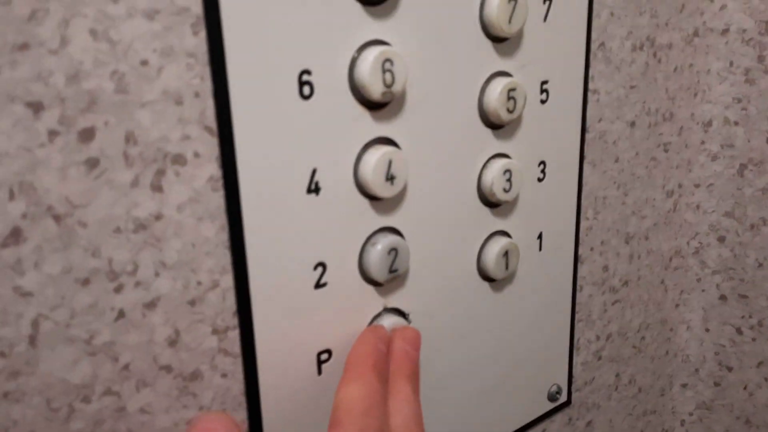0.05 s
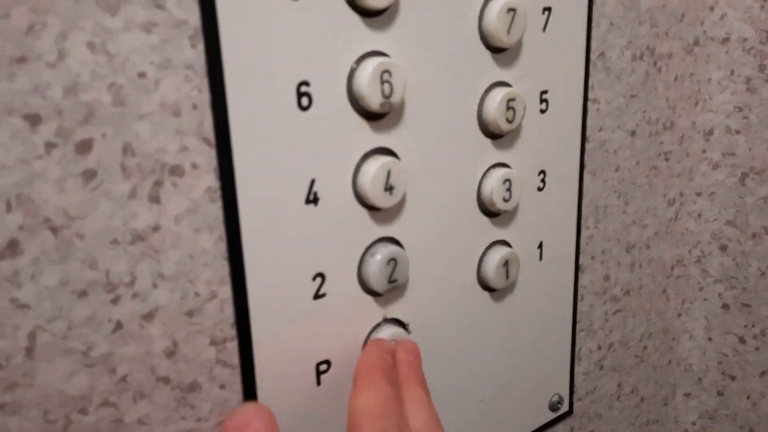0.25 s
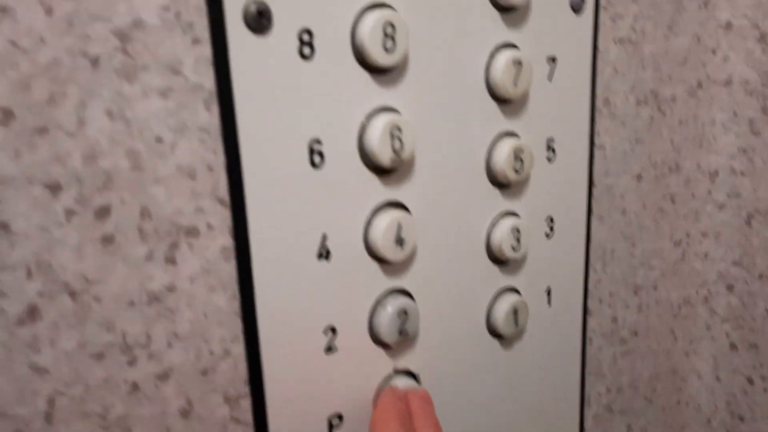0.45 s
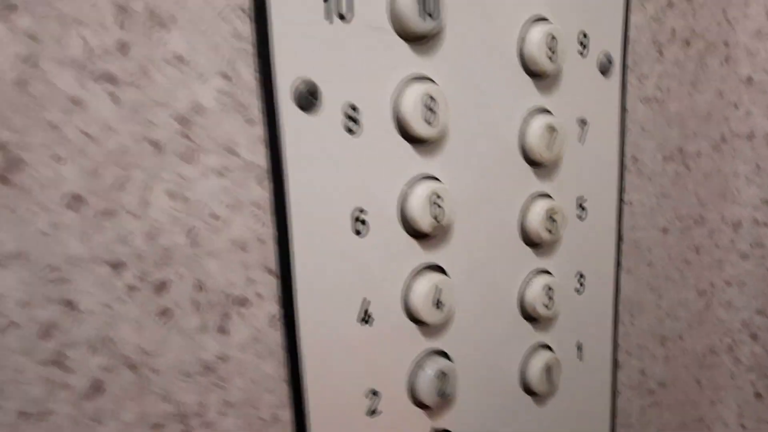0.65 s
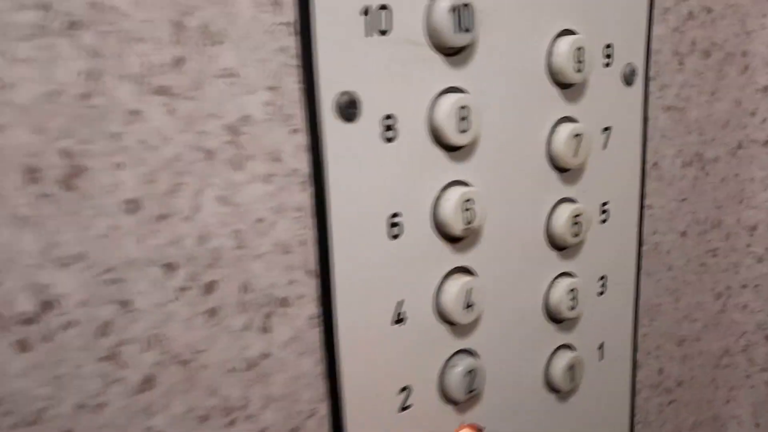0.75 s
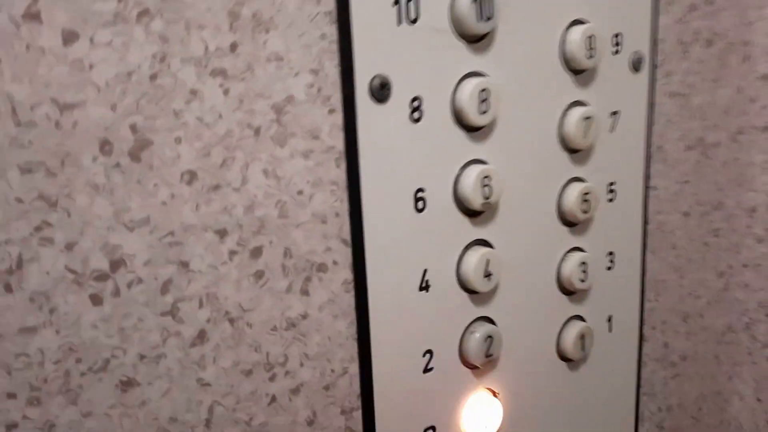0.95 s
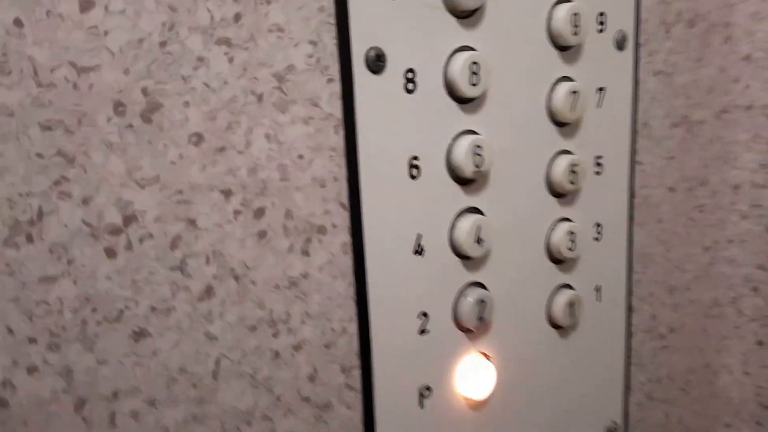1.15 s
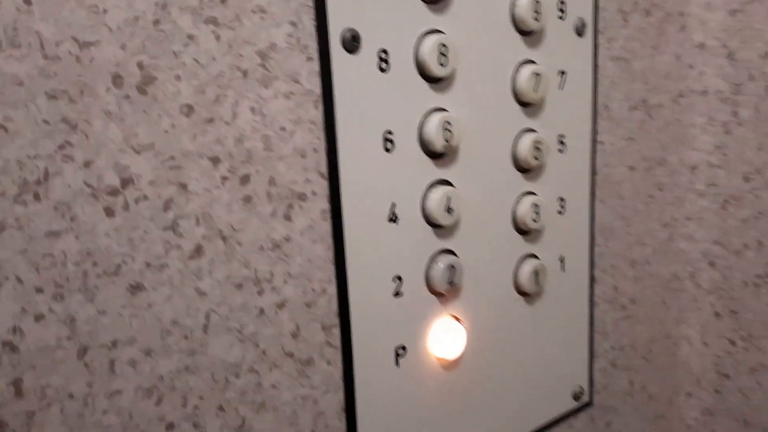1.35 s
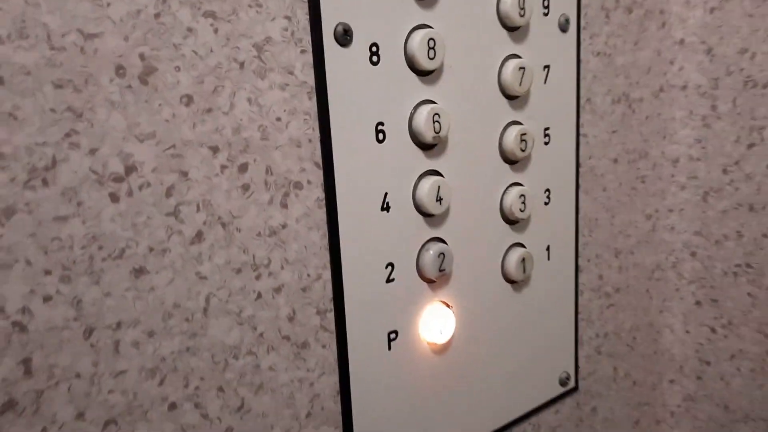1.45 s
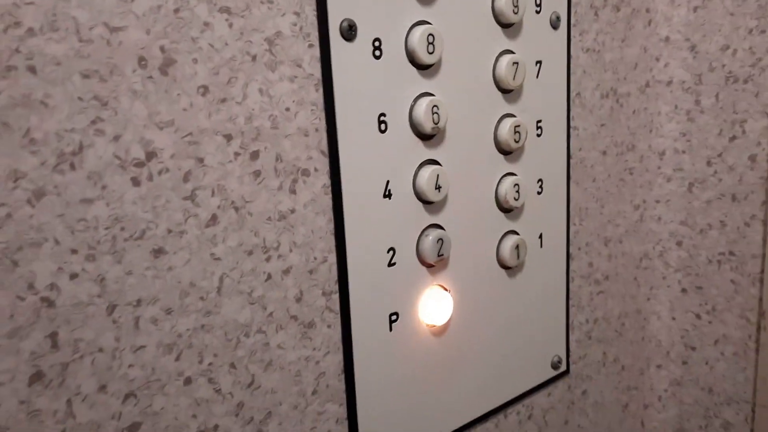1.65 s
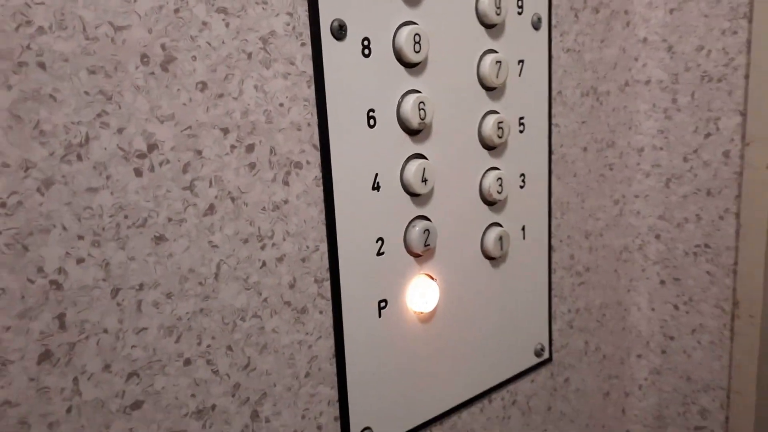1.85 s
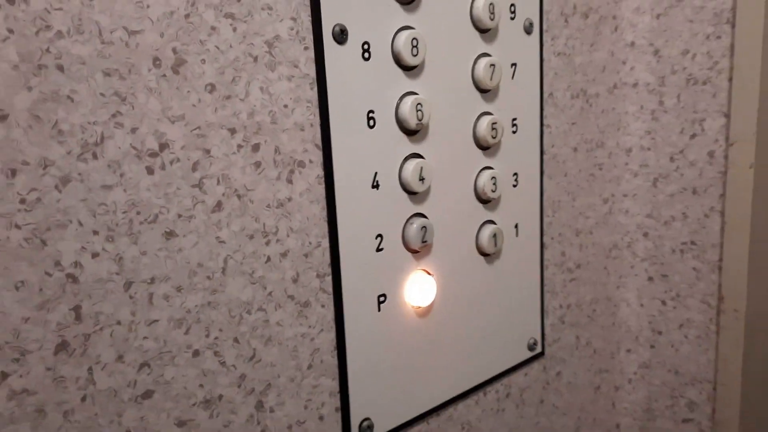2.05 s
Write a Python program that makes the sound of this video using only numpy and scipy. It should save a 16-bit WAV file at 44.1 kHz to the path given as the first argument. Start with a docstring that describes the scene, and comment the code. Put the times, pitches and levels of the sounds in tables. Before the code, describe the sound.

Relays clack in an elevator after a button press, with a low hum and brief squeak.

```python
"""In a small elevator cabin, a button is pressed. Relays and a lock clack behind the wall and make the
panels ring. The drive hums and rumbles, a dry joint squeaks as it sticks and slips, something clunks,
and the button snaps back. A sleeve rustles, cloth on cloth, as the arm is drawn away. A few small ticks
sound close by, and a finger bumps the microphone."""
import sys
import numpy as np
from scipy import signal
from scipy.fft import rfft, irfft
from scipy.io import wavfile

SR = 44100
rng = np.random.default_rng(int(sys.argv[2]) if len(sys.argv) > 2 else 0)


def store_wav(level_fs):
    """Save 16-bit WAV to argv[1]."""
    pcm = np.round(np.clip(np.atleast_2d(level_fs), -1, 1) * 32767)
    wavfile.write(sys.argv[1], SR, pcm.T.astype(np.int16))


N = 92610
T = np.arange(N) / SR
HZ = np.fft.rfftfreq(N, 1 / SR)

# How alike left and right are: f/Hz, correlation (1 = the same)
LIKENESS = [(40, .99), (180, .95), (350, .72), (700, .15), (1100, -.35), (2800, 0), (12000, 0)]
# How much louder the left side is: f/Hz, left minus right/dB
BALANCE = [(40, 2), (170, 1), (350, 4), (700, 2), (1400, 4), (2800, 6), (7000, 4.5), (9500, 5.5),
           (13000, -0.5)]
# The quiet hush of the cabin: f/Hz, level/dB per Hz
HUSH_COLOUR = [(20, -102), (60, -97.5), (130, -105), (310, -102), (600, -111), (1500, -115), (7000, -115),
               (10000, -119)]

# How the drive swells and fades: t/s, rumble gain/dB, hum gain/dB
DRIVE_SWELL = [(0, -22.5, -48), (.07, -24, -30), (.16, -12, -15.5), (.25, 2, -4.5), (.45, 3, -1),
               (.6, 7.5, -6.5), (.76, 3.5, 1), (.89, 1.5, -4.5), (1, -20.5, -7), (1.1, -13, -10),
               (1.25, -21, -19), (1.42, -31, -34.5), (1.7, -47, -38), (2.1, -56.5, -44)]
# Tones of the hum: f/Hz, base level/dB, extra fade once the drive eases/dB per s
HUM_TONES = [(44.1, -45.5, 3.6), (90.3, -40.5, 4.2), (170.9, -36, 70), (256.5, -46.5, 25), (279.9, -52, 50),
             (343, -55, 3.4)]
# The drive's rumble: f/Hz, base level/dB per Hz
RUMBLE_COLOUR = [(18, -60), (35, -65), (70, -62.5), (150, -60.5), (210, -83.5), (290, -61.5), (450, -84.5),
                 (800, -85.5), (1500, -95.5), (4000, -100), (12000, -115)]

# How the sleeve's rub and its finer fizz come and go: t/s, gain/dB
RUB_SWELL = [(0, -48), (.1, -28.5), (.19, -9), (.3, -45), (.6, 0.5), (.8, -3), (.95, -4), (1.03, 4),
             (1.15, 3), (1.27, -1), (1.36, -0.5), (1.46, -3), (1.57, -14.5), (1.7, -17.5), (1.84, -23.5),
             (1.92, -33), (2.02, -49), (2.1, -45)]
FIZZ_SWELL = [(0, -26), (.1, -39), (.19, -18), (.3, -17.5), (.5, -14), (.6, -10.5), (.75, -12), (.95, -9),
              (1.03, 0), (1.12, 1.5), (1.25, -7.5), (1.4, -8), (1.52, -13.5), (1.68, -16.5), (1.83, -25.5),
              (1.91, -16), (2.02, -27), (2.06, -19.5)]
# Their mix of low and high sound: f/Hz, base level/dB per Hz
RUB_COLOUR = [(100, -100), (350, -86), (700, -88.5), (1400, -90), (2500, -89.5), (4500, -91.5),
              (8200, -92.5), (9500, -112.5), (16000, -104)]
FIZZ_COLOUR = [(1500, -112), (4000, -92.5), (7500, -83.5), (9800, -90.5), (12000, -85), (16000, -92)]
# Small ticks nearby: t/s, gain/dB, centre f/Hz, width/octaves, echo gain/dB, left minus right/dB
TICKS = [(1.181, -1.5, 520, .55, 1, 0), (1.182, -16, 2600, .7, -3, 6), (1.4745, -13, 1300, .9, -3, 5),
         (1.5243, -26, 9000, .8, -20, -14)]

# How loud the squeak is: t/s, base level/dB
SQUEAK_SWELL = [(.62, -50), (.655, -41), (.678, -27), (.70, -31), (.745, -46), (.768, -36), (.805, -35),
                (.835, -40), (.875, -39), (.915, -54), (.95, -42), (.972, -54), (1.04, -47), (1.12, -64)]
# Its pitch: t/s, f/Hz
SQUEAK_PITCH = [(.62, 1440), (.662, 1375), (.68, 1325), (.72, 1365), (.76, 1325), (.79, 1385), (.83, 1345),
                (.862, 1295), (.885, 1365), (.99, 1378), (1.06, 1340)]
# How shrill it is: t/s, overtone gain/dB
SQUEAK_EDGE = [(.62, -12), (.665, -7), (.69, -9), (.735, 6), (.78, -4), (.86, -15), (1.1, -20)]
# Its overtones: multiple of the pitch, base gain/dB, gain in the flare as the joint catches/dB
OVERTONES = [(2, -7, -22), (3, -14.5, -22), (4, -17, -16.5), (5, -22, -7)]
# The rubbing under the squeak: t/s, gain/dB
RASP_SWELL = [(.57, -35), (.61, -9), (.63, 2.5), (.68, 1.5), (.73, -6.5), (.81, -8.5), (.845, 1.5),
              (.89, -9.5), (.94, -18)]
# The narrow band of that rubbing: f/Hz, base level/dB per Hz
RASP_COLOUR = [(900, -105), (1250, -70), (1400, -69), (1720, -69.5), (1900, -83), (2600, -105)]

# The dull clunk: f/Hz, level/dB per Hz
CLUNK_COLOUR = [(25, -72), (120, -55), (180, -49), (235, -50), (310, -52), (450, -66), (880, -68),
                (1000, -58), (1100, -72), (5000, -85), (10000, -102)]
# The button's bright crack: f/Hz, gain/dB
SNAP_COLOUR = [(2000, -26), (5000, -5), (9500, -20), (12000, 1), (16000, -4)]

# Blows of the relays and lock: t/s, rise/s, five band gains/dB (low to high), panel gain/dB
BLOWS = [(0.222, 0.0059, 13.5, -28, -47, -37.5, -38.5, -10.5),
         (.260, 0.018, 4, -5.5, -5, -19.5, -28.5, -0.5), (.274, 0.011, 1, -3, -4, 5.5, 11, -6),
         (.297, 0.023, -9.5, 3, 9.5, -7, -11.5, 1), (.343, 0.004, 0, 1, -5, -4, -5, 4),
         (0.366, 0.0049, 9.5, -17, -7, -1.5, 5.5, 1), (.383, 0.0042, -13, 4, 7, 5.5, -9, 1),
         (.444, 0.0085, -12.5, -2, -5.5, -29.5, -22, 4), (.545, 0.0031, -15, -32, -10.5, -22, 0, -35),
         (.722, 0.0041, -18.5, -9.5, -18, -27, -25.5, -12.5), (.827, 0.0061, -11, -15, 0, 0, 14.5, -35),
         (.848, .002, -13, -5, -20, -20, -10, -8), (1.326, 0.0013, -71.5, -25, -5, -11, -18, -32)]
# Where those five bands lie: f/Hz
BAND_HZ = [70, 500, 2600, 7000, 13000]
# The rattle after a blow: f/Hz, base level/dB per Hz
RATTLE_COLOUR = [(20, -46.5), (40, -56), (70, -58.5), (170, -54.5), (300, -55), (600, -60), (1050, -67),
                 (1500, -76), (2300, -71.5), (5000, -76.5), (8300, -76.5), (9400, -88.5), (12000, -89.5),
                 (16000, -99)]
# How long the rattle lasts: f/Hz, t60/s (the time to fade by 60 dB)
RATTLE_T60 = [(50, 0.84), (170, 0.42), (300, .7), (500, 0.48), (1000, 0.29), (7000, 0.28), (13000, 0.24)]
# Tones at which the panels ring: f/Hz, base level/dB, t60/s
PANEL_TONES = [(134.25, -30, 0.45), (162.8, -31, .5), (304, -36, 0.46), (432.4, -30.5, 0.28),
               (581, -39, 0.42), (714.4, -43, 0.35), (818, -40, 0.28), (993, -32.5, 0.25),
               (1180, -48.5, 0.4), (2065, -44.5, .35), (2818, -46, 0.25), (3630, -43.5, 0.094),
               (5120, -49.5, 0.24)]

SPLIT = np.array([[.5], [-.5]])  # shares a difference between left and right


def amp(db):
    """Turn decibels into a gain."""
    return 10 ** (np.asarray(db) / 20)


def fade(t, t60):
    """A gain that falls by 60 dB every t60 seconds."""
    return amp(-60 * t / t60)


def read(points, hz):
    """Look up a table by frequency, on a log scale."""
    f, value = np.transpose(points)
    return np.interp(np.log(hz + 1), np.log(f + 1), value)


def curve(points, column=1):
    """Look up a table by time, at every sample."""
    rows = np.array(points)
    return np.interp(T, rows[:, 0], rows[:, column])


def wander(hz):
    """A random wobble of about size 1, with speeds up to about hz."""
    x = irfft(rfft(rng.standard_normal(N)) * np.exp(-(HZ / hz) ** 2), N)
    return x / x.std()


def sides(db):
    """Left and right gains, with the left louder by db."""
    return amp(SPLIT * db)


def noise(db):
    """Stereo noise that fills the cabin, with a given level per Hz."""
    middle, side = rfft(rng.standard_normal((2, N)))
    alike = np.clip(read(LIKENESS, HZ), -.99, .99)
    side *= np.sqrt((1 - alike) / (1 + alike))
    spectrum = np.array([middle + side, middle - side]) * sides(read(BALANCE, HZ))
    return irfft(spectrum * amp(db), N) * np.sqrt(SR / 2)


def echo(x, t60):
    """Sound bounces between the close walls and blurs into a short tail."""
    t = T[:SR // 2]
    tail = rng.standard_normal((2, len(t))) * fade(t, t60) * (t > .002)
    return signal.fftconvolve(x[None], tail / np.linalg.norm(tail[0]), axes=1)[:, :N]


def faint_ring():
    """A faint, wavering tone fades from the very start."""
    return amp(-68) * fade(T, t60=3.1) * np.sin(2 * np.pi * 607 * T + wander(hz=60))


def drive(ease_s=.75, flutter_db=2.5, pitch_waver=.0156):
    """The drive's wavering hum and its rumble swell and die away."""
    out = amp(curve(DRIVE_SWELL)) * noise(read(RUMBLE_COLOUR, HZ))
    swell_db = curve(DRIVE_SWELL, column=2)
    for f, db, fall in HUM_TONES:
        level = db + swell_db - fall * np.maximum(T - ease_s, 0) + flutter_db * wander(hz=34.8)
        phase = 2 * np.pi * np.cumsum(f * (1 + pitch_waver * wander(hz=14.9))) / SR
        out += np.sqrt(2) * amp(level) * sides(read(BALANCE, f)) * np.sin(phase)
    return out


def sleeve(grain_db=1):
    """Cloth slides on cloth: a grainy rub and a fine fizz."""
    grain = amp(grain_db * wander(hz=250))
    rub = amp(curve(RUB_SWELL)) * noise(read(RUB_COLOUR, HZ))
    fizz = amp(curve(FIZZ_SWELL)) * noise(read(FIZZ_COLOUR, HZ))
    return grain * (rub + fizz)


def tick(at_s, db, hz, octaves, echo_db, left_db):
    """One short click nearby, with its echo from the walls."""
    band = np.exp(-.5 * (np.log2((HZ + 1) / hz) / octaves) ** 2)
    delay = np.exp(-2j * np.pi * HZ * at_s)
    click = amp(db) * irfft(band * delay, N)
    return sides(left_db) * (click + amp(echo_db) * echo(click, t60=.15))


def finger_bump(at_s=1.529, start_hz=133, end_hz=51.4, sag_s=.0078, rise_s=.0079):
    """A finger bumps the right microphone: a soft thud that drops in pitch."""
    t = np.maximum(T - at_s, 0)
    hz = end_hz + (start_hz - end_hz) * np.exp(-t / sag_s)
    phase = 2 * np.pi * np.cumsum(hz * (t > 0)) / SR
    pulse = amp(-34) * t / rise_s * np.exp(1 - t / rise_s)
    return amp([[-22], [0]]) * pulse * np.sin(phase)


def squeak(catch_s=.669, flare_s=.007, pitch_jitter=.017, flutter_db=3.94, left_lead_rad=1.8):
    """A dry joint rasps, then sticks and slips fast enough to make an unsteady tone."""
    hz = curve(SQUEAK_PITCH) * (1 + pitch_jitter * wander(hz=253))
    phase = 2 * np.pi * np.cumsum(hz) / SR
    apart = left_lead_rad * SPLIT
    flare = np.exp(-.5 * ((T - catch_s) / flare_s) ** 2)
    edge = amp(curve(SQUEAK_EDGE))
    overtones = sum((amp(db) * edge + amp(flare_db) * flare) * np.sin(k * phase + apart)
                    for k, db, flare_db in OVERTONES)
    tone = amp(curve(SQUEAK_SWELL) + flutter_db * wander(hz=71)) * (np.sin(phase + apart) + overtones)
    tone *= (T > SQUEAK_SWELL[0][0]) * (T < SQUEAK_SWELL[-1][0])
    rasp = amp(curve(RASP_SWELL)) * noise(read(RASP_COLOUR, HZ))
    rasp *= (T > RASP_SWELL[0][0]) * (T < RASP_SWELL[-1][0])
    return sides(db=3) * (tone + amp(-6) * echo(tone[0], t60=.2)) + rasp


def clunk(at_s=.660, rise_s=.012, hold_s=.026, boom_hz=180, boom_rise_s=.013):
    """A heavy, dull clunk from beyond the wall, with a brief boom."""
    t = T - at_s
    rise = np.clip(t / rise_s, 0, 1)
    fall = fade(np.maximum(t - hold_s, 0), t60=.22)
    boom_age = np.maximum(t - rise_s / 2, 0) / boom_rise_s  # 1 at the boom's peak
    boom = amp(-20.5) * boom_age * np.exp(1 - boom_age) * np.sin(2 * np.pi * boom_hz * t)
    return noise(read(CLUNK_COLOUR, HZ)) * rise * fall + boom


def button_snap(at_s=.8305):
    """The button springs back with a crisp crack."""
    t = np.maximum(T - at_s, 0)
    return noise(read(SNAP_COLOUR, HZ) - 69) * (t > 0) * fade(t, t60=.06)


def rattle(force, peak_db=7, valley_db=-2, sharpness=70, flutter_db=1.3):
    """A blow sets off a dense rattle, stronger near the panel tones; the highs die first."""
    peaks = sum(1 / (1 + ((HZ - f) / (4 + f / (2 * sharpness))) ** 2) for f, _, _ in PANEL_TONES)
    colour = read(RATTLE_COLOUR, HZ) + valley_db + peak_db * peaks
    rough = noise(colour + read(force, HZ)) * amp(flutter_db * wander(hz=199))
    hz, t, bands = signal.stft(rough[:, :SR], SR, nperseg=512)
    bands *= fade(t, read(RATTLE_T60, hz)[:, None])
    return signal.istft(bands, SR, nperseg=512)[1][:, :SR]


def panel_ring(force, panel_db, pitch_waver=.012):
    """A blow makes the loose panels ring, each tone wavering as it fades."""
    out = np.zeros((2, SR))
    for f, db, t60 in PANEL_TONES:
        apart = np.arccos(read(LIKENESS, f)) * SPLIT
        phase = 2 * np.pi * f * np.cumsum(1 + pitch_waver * wander(hz=39.7)[:SR]) / SR
        gain = sides(read(BALANCE, f)) * amp(db + panel_db + read(force, f))
        out += gain * fade(T[:SR], t60) * np.sin(phase + apart)
    return out


def clacks():
    """Relays and a lock strike behind the wall; each blow rattles and rings."""
    out = np.zeros((2, N))
    for at_s, rise_s, *band_db, panel_db in BLOWS:
        force = list(zip(BAND_HZ, band_db))
        rise = np.minimum(T[:SR] / rise_s, 1)
        clack = (rattle(force) + panel_ring(force, panel_db)) * rise
        start = round(at_s * SR)
        out[:, start:start + SR] += clack[:, :N - start]
    return out


def scene():
    """All the sounds together, over the hush of the cabin."""
    background = noise(read(HUSH_COLOUR, HZ)) + faint_ring() + drive()
    mix = background + squeak() + sleeve() + finger_bump() + clunk() + button_snap() + clacks()
    return mix + sum(tick(*row) for row in TICKS)


def record(dry, low_hz=30, high_hz=16100):
    """Cut away the deepest rumble and the very highest hiss."""
    low_cut = signal.butter(5, low_hz, "highpass", fs=SR, output="sos")
    high_cut = signal.firwin(511, high_hz, window=("kaiser", 9), fs=SR)
    return signal.oaconvolve(signal.sosfilt(low_cut, dry), high_cut[None], "same")


dry = scene()
out = record(dry)
store_wav(out)
```